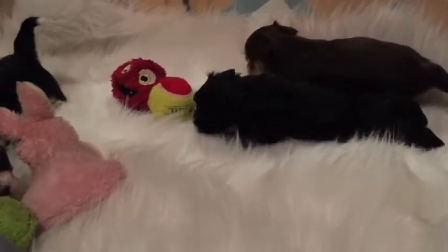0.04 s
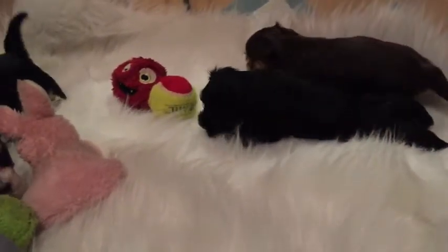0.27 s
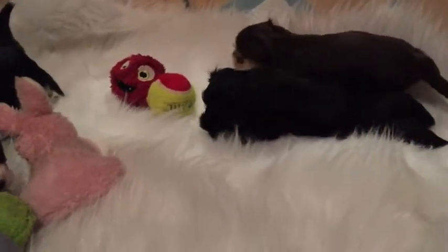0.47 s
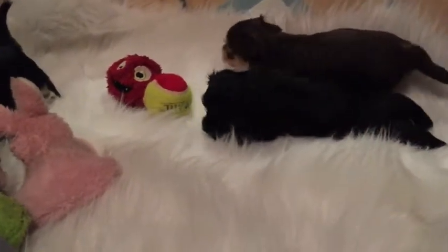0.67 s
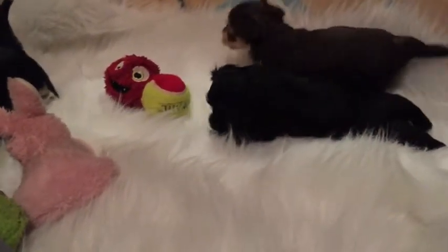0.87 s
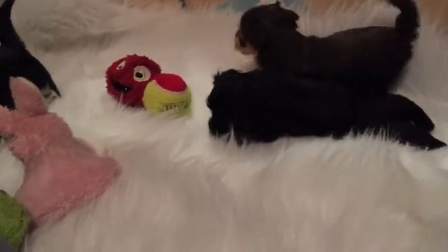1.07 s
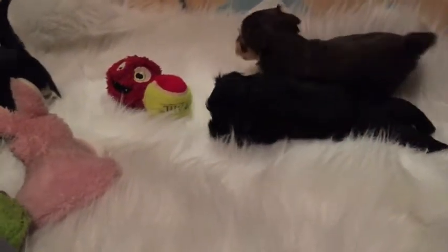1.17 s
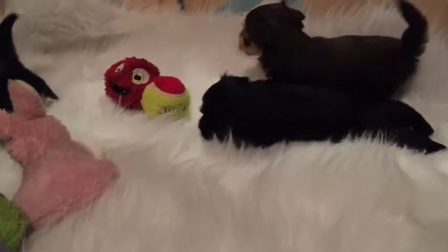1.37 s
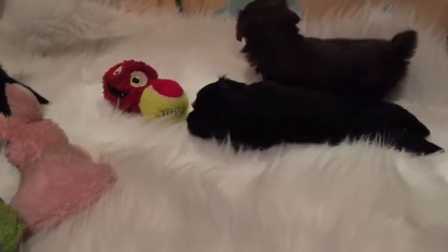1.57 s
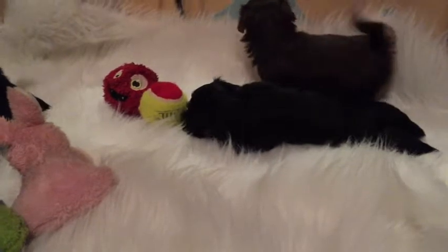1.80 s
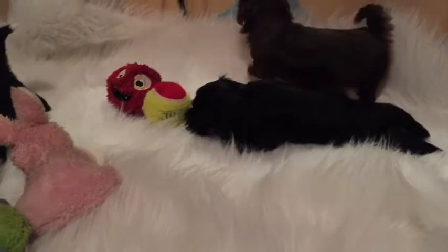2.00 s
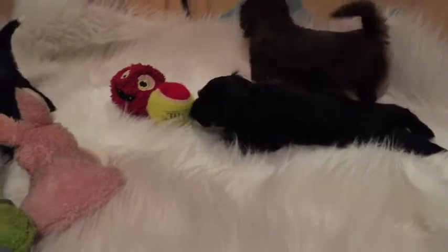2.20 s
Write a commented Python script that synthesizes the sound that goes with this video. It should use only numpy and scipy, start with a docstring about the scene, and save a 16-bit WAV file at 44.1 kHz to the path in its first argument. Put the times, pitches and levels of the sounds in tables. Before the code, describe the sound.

One brief, raspy bark from a small puppy sounds close by in a quiet room with a low hum. Afterwards fur brushes faintly against a rug, paws land softly, and claws and mouths tick lightly.

```python
"""A small, quiet room with a low mains hum; one microphone, close to puppies on a shaggy rug.
After a soft paw fall, a small puppy gives one short, hoarse wuff: a creaky catch of the throat,
a rough note that rises and falls, and a hiss as the muzzle closes. Then the puppies shuffle about:
fur brushes the rug, paws thud softly, and claws and mouths make tiny ticks."""
import sys
import numpy as np
from scipy import signal
from scipy.fft import rfft, irfft, next_fast_len
from scipy.io import wavfile
from scipy.ndimage import map_coordinates

SR = 44100
rng = np.random.default_rng(int(sys.argv[2]) if len(sys.argv) > 2 else 0)


def output_pcm(signal):
    """Save a mono or channel-first signal as 16-bit PCM at the path in sys.argv[1].

    Samples are clipped to [-1, 1] before scaling.
    """
    pcm = np.clip(np.atleast_2d(signal).T, -1, 1) * 32767
    wavfile.write(sys.argv[1], SR, np.round(pcm).astype(np.int16))


N = 99225  # 2.25 s


def amp(db):
    return 10 ** (np.asarray(db) / 20)


def unit(x):
    return x / np.sqrt(np.mean(x ** 2) + 1e-20)


def clock():
    """Time of each sample in seconds."""
    return np.arange(N) / SR


def along(points, hz):
    """Read (freq_hz, value) points on a log frequency axis."""
    freqs, values = np.transpose(points)
    return np.interp(np.log(hz + 1), np.log(freqs + 1), values)


def wobble(rate):
    """A smooth random curve with `rate` knots a second."""
    return map_coordinates(rng.standard_normal(int(N * rate / SR) + 4), [clock() * rate])


def filtered(x, response):
    """Filter x by a gain given as a function of frequency."""
    size = next_fast_len(N + SR // 2)
    return irfft(rfft(x, size) * response(np.fft.rfftfreq(size, 1 / SR)), size)[:N]


def noise(colour):
    """Noise of rms 1 with a (freq_hz, gain_db) spectrum."""
    return unit(filtered(rng.standard_normal(N), lambda hz: amp(along(colour, hz))))


def band(centre_hz, octaves):
    """Noise of rms 1 in one bell-shaped band."""
    bell = lambda hz: np.exp(-.5 * (np.log2((hz + 1) / centre_hz) / octaves) ** 2)
    return unit(filtered(rng.standard_normal(N), bell))


def ring(colour, size=2048):
    """Minimum-phase impulse response of energy 1 with a (freq_hz, gain_db) spectrum."""
    cepstrum = irfft(np.log(amp(along(colour, np.fft.rfftfreq(size, 1 / SR)))))
    cepstrum[1:size // 2] *= 2
    cepstrum[size // 2 + 1:] = 0
    impulse = irfft(np.exp(rfft(cepstrum)))
    return impulse / np.linalg.norm(impulse)


def room_tone():
    """Three wavering harmonics of the mains over a low rumble and a faint, even hiss."""
    # slow swells of the hum: time_s, second_harmonic_db, third_harmonic_db
    hum_swells = [(0.0, -63, -61.5), (0.21, -57.5, -63), (0.25, -76, -65), (0.3, -53.5, -55.5),
                  (0.41, -68, -61.5), (0.8, -56.5, -63), (1.06, -68.5, -61.5), (1.36, -59, -58),
                  (1.5, -69, -68.5), (1.62, -72, -59.5), (1.66, -61, -61.5), (1.74, -69, -67.5),
                  (1.77, -59.5, -61.5), (1.98, -65.5, -66.5), (2.21, -59.5, -61.5), (2.25, -63, -64)]
    # spectra of the rumble and the noise floor: freq_hz, gain_db
    rumble_colour = [(20, -40), (40, -16), (65, -2.5), (110, -1), (200, -5.5), (280, -14.5), (450, -36.5),
                     (1000, -84.5)]
    floor_colour = [(100, -0.5), (300, 0.5), (500, 0), (800, -4), (1500, -4), (3000, -8), (6000, -12),
                    (10000, -15.5), (15000, -17.5)]
    mains_hz, fourth_db, waver_db = 60, -74.5, 0.68
    t, hum = clock(), np.zeros(N)
    times, second_db, third_db = np.transpose(hum_swells)
    for k, db in [(2, np.interp(t, times, second_db)), (3, np.interp(t, times, third_db)), (4, fourth_db)]:
        peak = np.sqrt(2) * amp(db + waver_db * wobble(14))
        phase = 2 * np.pi * k * mains_hz * t + 0.22 * wobble(7.94)
        hum += peak * np.sin(phase + 2 * np.pi * rng.random())
    return hum + amp(-66) * noise(rumble_colour) + amp(-70) * noise(floor_colour)


def room_tail(x, delay_s=.004):
    """The near walls return a short diffuse tail, each frequency dying at its own speed."""
    # decay of the room: freq_hz, t60_s
    decay_times = [(150, 0.25), (500, 0.23), (900, 0.2), (1130, 0.28), (1400, 0.21), (3000, 0.35),
                   (7000, 0.17), (9500, 0.22), (11300, 0.4), (13000, 0.16), (15000, 0.22)]
    hz, t, spectra = signal.stft(rng.standard_normal(SR // 2), SR, nperseg=256)
    decay = amp(-60 * t / along(decay_times, hz)[:, None])
    tail = signal.istft(spectra * decay, SR, nperseg=256)[1]
    delayed = np.pad(x, (round(delay_s * SR), 0))
    return signal.fftconvolve(delayed, tail / np.linalg.norm(tail))[:N]


def rug_rustle(snaps_per_s=1100, hair_share=0.42):
    """Fur brushes the rug in swells: a dull rub, and a fizz with the snaps of single hairs in it."""
    # strokes of fur: centre_s, half_length_s, level_db, fizz_over_rub_db
    brushes = [(0.981, 0.018, -62, -5.5), (1.058, .028, -67.5, 0), (1.107, .018, -74, -9),
               (1.159, 0.024, -69, 8), (1.678, 0.0069, -68.5, -18), (1.794, 0.018, -69.5, -5),
               (1.875, 0.02, -71, -3.5), (1.94, 0.021, -83, 9), (2.038, 0.011, -71, 10.5),
               (2.137, .028, -71, 2.5)]
    # spectra of the rub and the fizz: freq_hz, gain_db
    rub_colour = [(150, -3.5), (400, -1), (1500, -5.5), (3000, -10.5), (8000, -14), (15000, -33)]
    fizz_colour = [(1000, -22), (3000, -8), (6000, -0.5), (9000, 2), (15000, -1.5)]
    t, rub_level, fizz_level = clock(), np.zeros(N), np.zeros(N)
    for centre_s, half_s, db, fizz_db in brushes:
        swell = amp(db) * np.exp(-.5 * ((t - centre_s) / half_s) ** 2)
        rub_level += swell
        fizz_level += swell * amp(fizz_db)
    snaps = (rng.random(N) < snaps_per_s / SR) * rng.standard_normal(N)
    hairs = unit(signal.fftconvolve(snaps, ring(fizz_colour))[:N])
    rub = noise(rub_colour)
    fizz = np.sqrt(1 - hair_share) * noise(fizz_colour) + np.sqrt(hair_share) * hairs
    return rub_level * rub + fizz_level * fizz


def ticks(t60_s=0.019):
    """Claws and mouths make tiny sharp contacts, each a fast-dying band of noise."""
    # contacts: start_s, level_db, centre_hz, width_octaves
    contacts = [(.759, -69, 11900, .25), (1.160, -57, 10000, .6), (1.192, -69, 12000, .2),
                (1.227, -58, 13200, 0.27), (1.555, -69, 14200, .2), (1.617, -62, 14100, 0.24),
                (1.682, -60.5, 5650, 0.5), (2.162, -57.5, 4300, 0.33), (2.175, -57.5, 4000, .35)]
    t, out = clock(), np.zeros(N)
    for start_s, db, hz, octaves in contacts:
        decay = amp(db - 60 * np.abs(t - start_s) / t60_s) * (t >= start_s)
        out += decay * band(hz, octaves)
    return out


def paws(fade_cycles=3.1, wander_rad=0.67):
    """Padded paws land with thuds that last a few cycles."""
    # paw falls: start_s, level_db, pitch_hz
    falls = [(0.113, -54, 72), (.392, -50, 70), (.978, -58, 566), (1.09, -56, 542), (1.68, -58.5, 380),
             (1.78, -60, 70.2), (1.853, -55, 645)]
    out = np.zeros(N)
    for start_s, db, hz in falls:
        cycles = np.maximum(clock() - start_s, 0) * hz
        envelope = amp(db) * (1 - np.exp(-2 * cycles)) * np.exp(-(cycles / fade_cycles) ** 2)
        out += envelope * np.sin(2 * np.pi * cycles + wander_rad * wobble(hz))
    return out


def muzzle_hiss():
    """The last air of the bark escapes through the narrowing mouth."""
    # air through the teeth: time_s, level_db
    airflow = [(.235, -83), (.262, -62.5), (.283, -53), (0.292, -39.5), (0.301, -43), (0.309, -37),
               (0.314, -54), (.33, -62)]
    # its spectrum: freq_hz, gain_db
    air_colour = [(300, -16), (1500, -0.5), (3000, -6), (4800, -6.5), (5900, 5), (7200, -1), (8400, -5.5),
                  (9600, 1), (10500, -10), (11400, -4), (13500, -11), (15200, -5.5)]
    times, db = np.transpose(airflow)
    return amp(np.interp(clock(), times, db, left=-np.inf, right=-np.inf)) * noise(air_colour)


def bark():
    """The throat creaks, then gives a rough note and a pulsed rasp; overtones die as the muzzle shuts."""
    # course of the wuff: time_s, pitch_hz, fundamental_db, overtones_db, rasp_db
    contour = [(.234, 377.5, -50, -42.5, -44), (.243, 385.6, -46, -43.5, -41.5),
               (.251, 419.5, -45, -34.5, -43.5), (.258, 489, -33.5, -29, -37.5),
               (.268, 505.6, -29, -36, -35.5), (.277, 535.7, -27.5, -23.5, -33),
               (.285, 518.8, -30, -38.5, -31), (.295, 412.4, -37, -31, -32.5), (.3, 291.5, -25, -57.5, -39),
               (0.314, 251, -49.5, -49.5, -49.5)]
    # resonances of throat and mouth, for the overtones and for the rasp: freq_hz, gain_db
    overtone_colour = [(500, -7), (760, -6), (900, -5), (1060, 1), (1250, 0.5), (1550, -8), (1980, -14),
                       (2350, -34.5), (2900, -34.5)]
    throat_colour = [(150, -24), (280, -7.5), (400, 1), (550, -3.5), (660, -6.5), (830, -13), (1080, 0.5),
                     (1350, -6), (1700, -8.5), (2020, -6), (2260, -20), (2850, -17.5), (3400, -34.5),
                     (4800, -36.5), (6000, -22), (7300, -34), (8500, -44), (15000, -66)]
    attack_s, release_s = 0.00155, 0.0024
    jitter, shimmer = .02, .15  # relative scatter of pitch and of amplitude
    flap_hz, flap_depth, creak_db = 178, 0.25, -18.5  # the throat's slower flapping and first pulses
    t = clock()
    times, pitch_hz, *levels_db = np.transpose(contour)
    attack = np.clip((t - times[0]) / attack_s + 1, 0, 1)
    gate = attack * np.exp(-np.maximum(t - times[-1], 0) / release_s)
    low_level, high_level, rasp_level = [gate * amp(np.interp(t, times, db)) for db in levels_db]
    hz = np.abs(np.interp(t, times, pitch_hz) * (1 + jitter * wobble(400)))
    phase = 2 * np.pi * np.cumsum(hz) / SR

    def partial(ratio):
        return (1 + shimmer * wobble(300)) * np.sin(ratio * phase + 2 * np.pi * rng.random())

    note = low_level * partial(0.96)  # the fundamental sits slightly flat
    note += high_level * sum(amp(along(overtone_colour, k * hz)) * partial(k) for k in range(2, 7))
    flap_phase = 2 * np.pi * np.cumsum(flap_hz * (1 + 0.168 * wobble(119.3))) / SR
    flap = 1 + flap_depth * np.cos(flap_phase)
    puffs = rng.standard_normal(N) * (1 + 0.91 * np.cos(phase))  # one puff of air a pitch cycle
    rasp = rasp_level * unit(flap * puffs)
    for k in range(3):  # the opening creak
        rasp[round((times[0] + k / flap_hz) * SR)] += amp(creak_db + 0.2 * k)
    return note + signal.fftconvolve(rasp, ring(throat_colour))[:N]


def scene():
    """The puppies close by, well above the room's tail, with room tone throughout."""
    puppies = bark() + muzzle_hiss() + rug_rustle() + ticks() + paws()
    return (puppies + amp(-15) * room_tail(puppies) + room_tone())[None]


def record(dry, top_hz=15620):
    """The mono microphone chain passes nothing above its band limit."""
    return filtered(dry[0], lambda hz: hz < top_hz)[None]


dry = scene()
out = record(dry)
output_pcm(out)
```